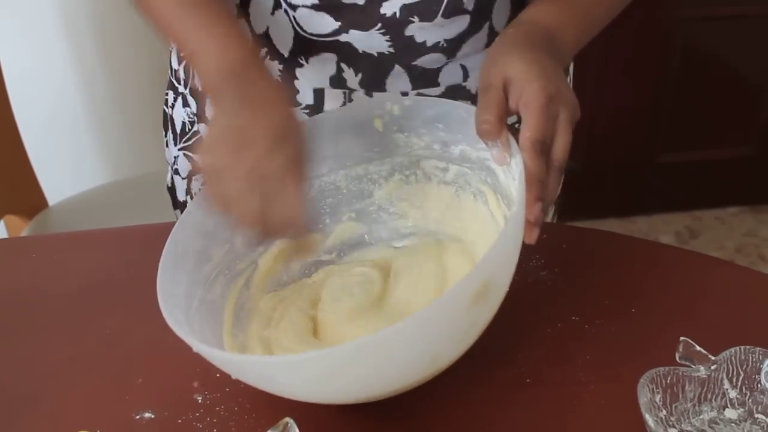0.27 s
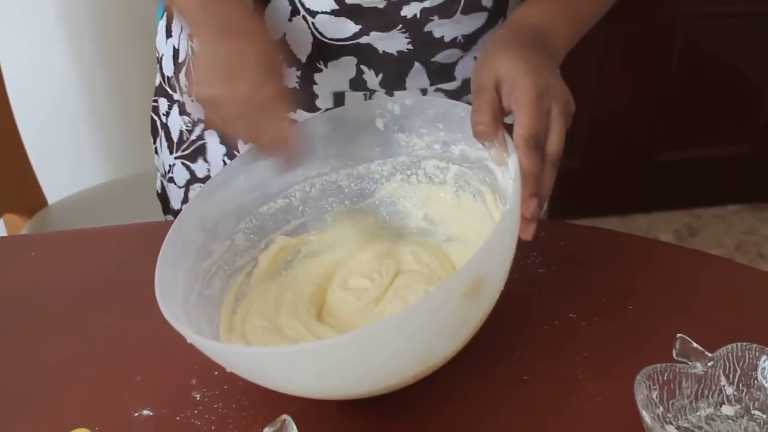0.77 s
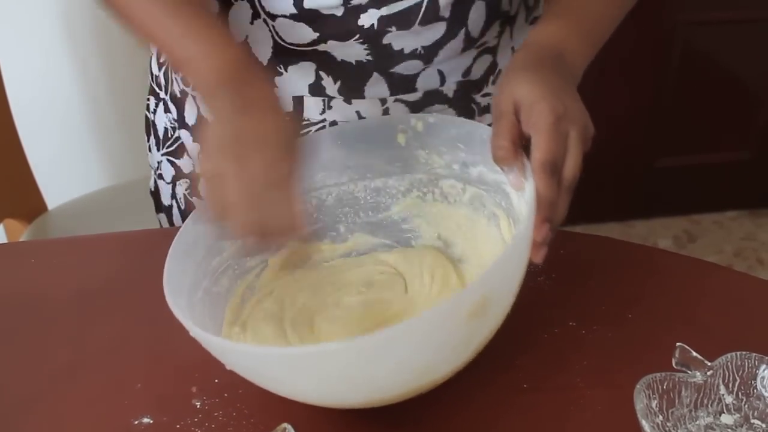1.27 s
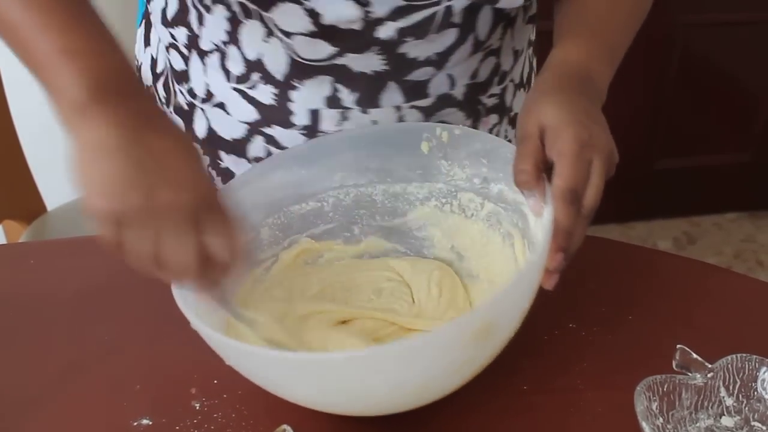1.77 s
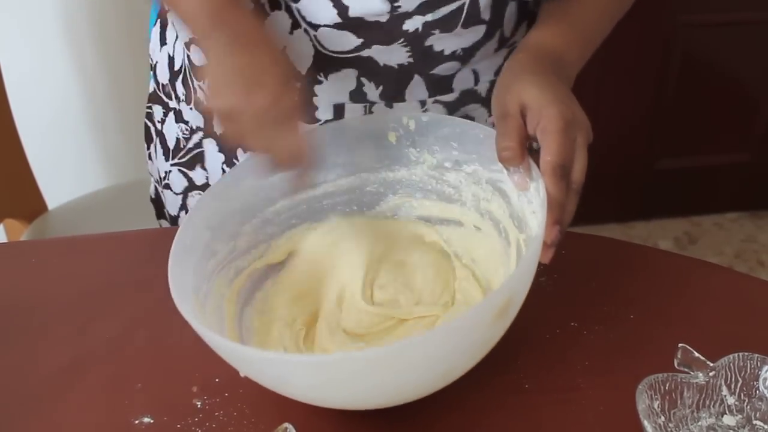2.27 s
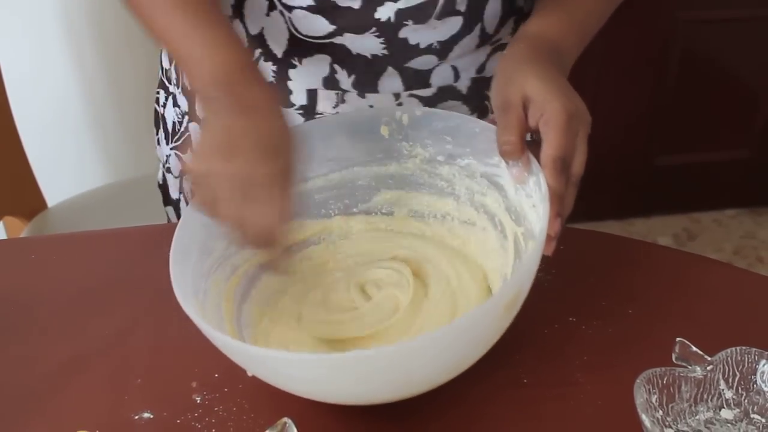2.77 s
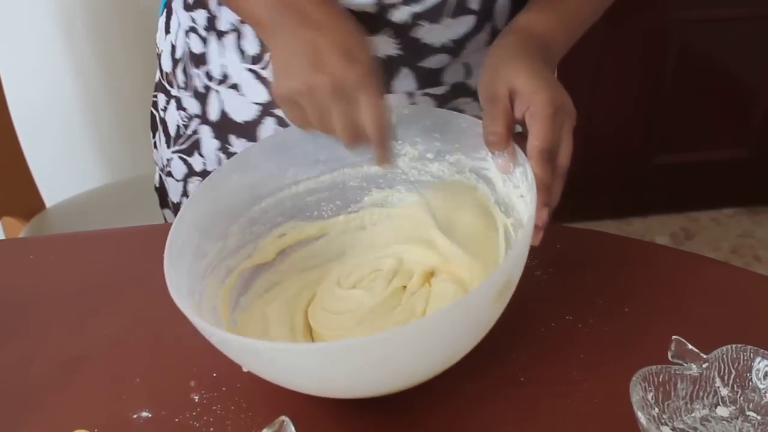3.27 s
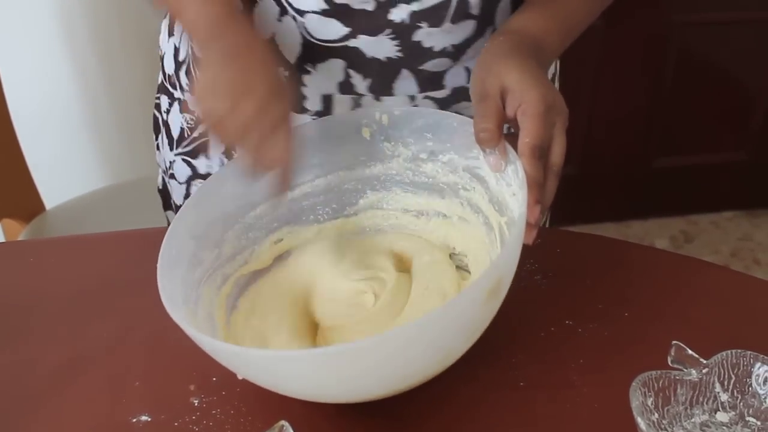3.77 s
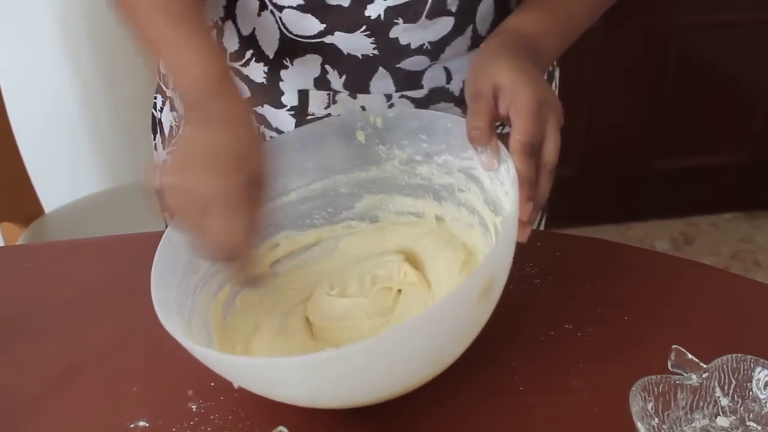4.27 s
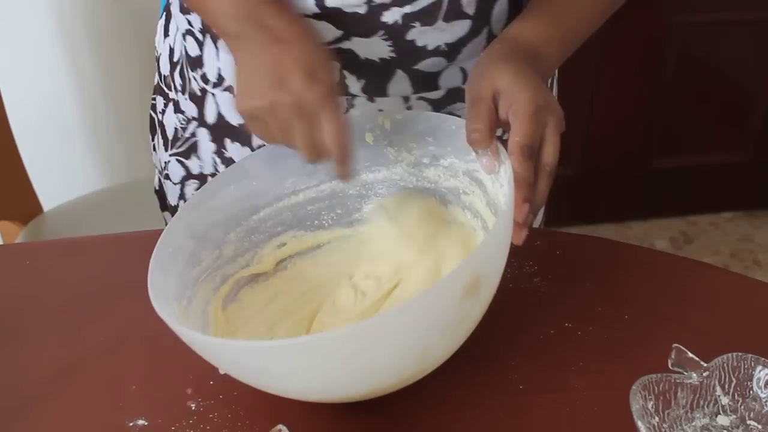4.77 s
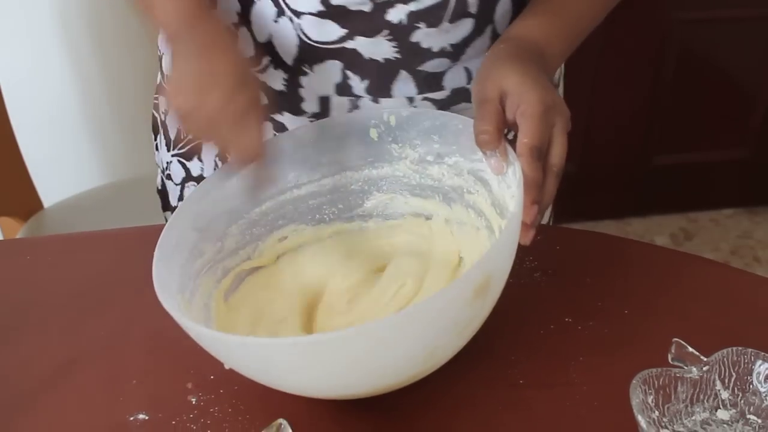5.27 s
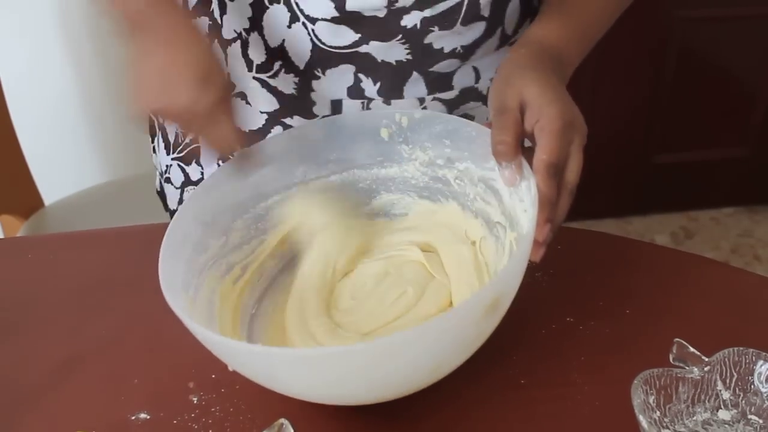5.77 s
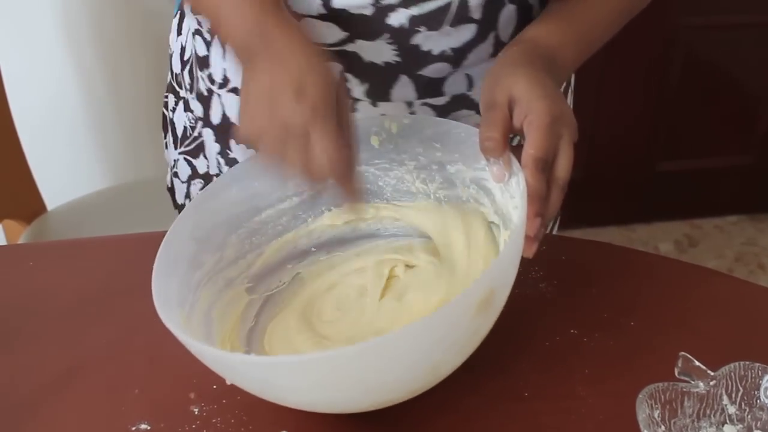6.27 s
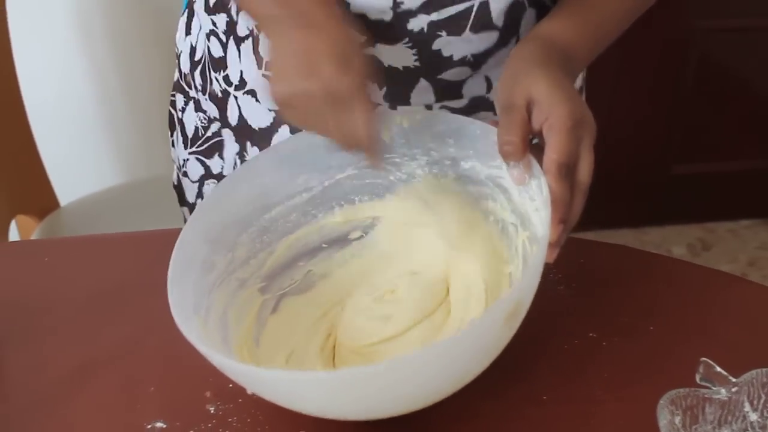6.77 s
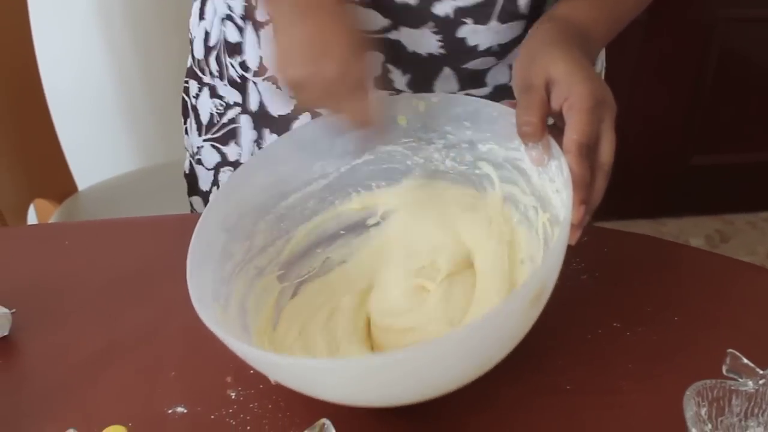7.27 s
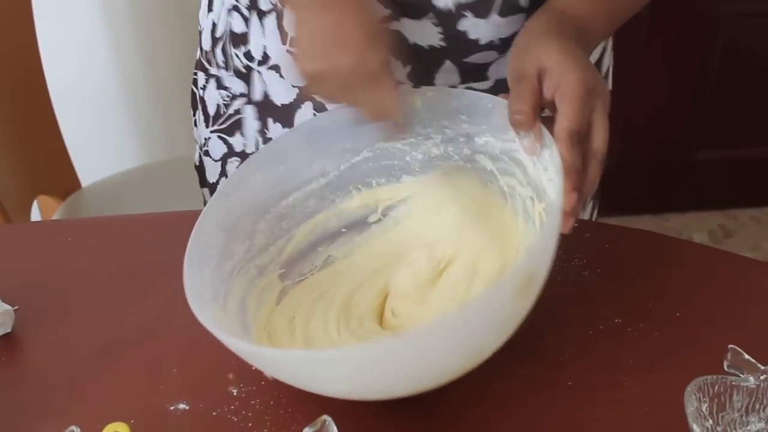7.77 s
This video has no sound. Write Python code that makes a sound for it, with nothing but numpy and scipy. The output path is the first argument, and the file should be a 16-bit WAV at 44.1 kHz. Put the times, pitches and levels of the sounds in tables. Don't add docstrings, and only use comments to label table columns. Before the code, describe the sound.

Close, rhythmic spoon knocks on a humming plastic bowl, each followed by a sugary scrape, quickening near the end in a lightly echoing kitchen.

```python
import sys
import numpy as np
from scipy import signal
from scipy.fft import rfft, irfft, next_fast_len
from scipy.io import wavfile
from scipy.ndimage import uniform_filter1d

SR = 44100
rng = np.random.default_rng(int(sys.argv[2]) if len(sys.argv) > 2 else 0)


def gain_from_db(level_db):
    decades = np.asarray(level_db, float) / 20
    return 10 ** decades


def master_out(mix):
    frames = np.transpose(np.atleast_2d(mix))
    ceiling = np.clip(frames, -1, 1)
    pcm = np.round(ceiling * 32767).astype(np.int16)
    wavfile.write(sys.argv[1], SR, pcm)


N = 354123


def unit(x):
    return x / np.sqrt(np.mean(x ** 2) + 1e-20)


def along(points, hz):
    f, v = np.transpose(points)
    return np.interp(np.log(hz + 1), np.log(f + 1), v)


def filtered(x, response):
    m = next_fast_len(len(x) + SR // 2)
    spectrum = rfft(x, m) * response(np.fft.rfftfreq(m, 1 / SR))
    return irfft(spectrum, m)[:len(x)]


def body(modes):
    def response(f):
        total = 0
        for k, (centre, width, db) in enumerate(modes):
            resonance = 1j * f * width / (centre * centre - f * f + 1j * f * width + 1)
            total = total + (-1) ** k * gain_from_db(db) * resonance
        return total
    return response


def colour(spectrum):
    return lambda hz: gain_from_db(along(spectrum, hz))


def grains(start_s, size, hz, cycles):
    k = np.arange(192)
    phase = k * hz[:, None] / SR
    wave = size[:, None] * np.sin(2 * np.pi * phase) * np.exp(-phase / cycles)
    where = (start_s * SR).astype(int)[:, None] + k
    return np.bincount(where.ravel(), wave.ravel(), N + SR)[:N]


# start_s, crack_peak_db, wall_ring_db and bowl_hum_db (both above crack), skid_grit_db
KNOCKS = [(0.1469, -19.5, 4.5, 4, -20), (0.485, -14.5, 2, -3.5, -20), (0.8463, -19.5, 7, 8.5, -18),
          (1.2114, -25.5, 11, 15.5, -27), (1.6827, -18, -3, -2, -20.5), (2.369, -13.5, 8.5, 3.5, -18),
          (2.692, -12, 5.5, 0, -24), (2.9236, -18, 1, 1, -20), (2.9844, -10, -9, -10.5, -19),
          (3.26, -15, 2, -3, -19), (3.5637, -22.5, 11, 9.5, -14), (3.787, -31.5, 7, 10, -54),
          (3.851, -18, 6.5, -1, -20), (4.123, -23, 3, 6.5, -21), (4.4733, -10.5, 4, 1.5, -17),
          (4.81, -8.5, 6.5, 2, -19), (5.0965, -15.5, 5, 5, -17.5), (5.404, -24.5, 7.5, 12, -28),
          (6.013, -25, -27, -2.5, -43), (6.0235, -14, -8, -23, -33.5), (6.1552, -18, -5, -30, -42)]
QUICK_KNOCKS = [(6.4802, -30, 16, 13.5, -30), (6.5167, -16.5, 7.5, 2.5, -15), (6.7221, -29.5, 7.5, 10, -33),
                (6.8003, -11.5, 0, 2, -16.5), (6.991, -22.5, 15.5, 8.5, -35), (7.067, -9, 2.5, 1.5, -12.5),
                (7.2417, -28, 12, 12, -47), (7.317, -12.5, 5, 5.5, -22), (7.47, -21, 10, 7.5, -31),
                (7.5714, -4.5, -13, -2, -34), (7.7195, -13.5, 3.5, -1, -23.5),
                (7.8116, -10.5, 9.5, 5.5, -23), (7.9519, -13, 4.5, -0.5, -20.5)]
# pitch_hz, level_db (per Hz)
CRACK_COLOUR = [(800, -47), (2000, -19), (3500, -4.5), (7000, -3), (12000, -14), (17000, -19)]
# pitch_hz, width_hz, level_db
THUD_MODES = [
    (435, 156, -1),
    (670, 150, -10.5),
]


def knocks():
    crack, wall_push, body_push = push = np.zeros((3, N))
    t = np.arange(256) / SR
    for s, db, wall_db, hum_db, _ in KNOCKS + QUICK_KNOCKS:
        at = round((s + 0.001072) * SR)
        crack[at:at + len(t)] += gain_from_db(db - 60 * t / 0.025) * np.sign(rng.standard_normal(len(t)))
        wall_push[at] = -gain_from_db(db + wall_db + 28.5)
        body_push[at] = -gain_from_db(db + hum_db + 40.5)
    push[1:] = signal.lfilter(np.hanning(18) / 8, 1, push[1:])
    late_push = np.roll(body_push, shift=40)
    clack = filtered(wall_push, body([(1800, 680, 1)]))
    clack += filtered(late_push / grip(), body(THUD_MODES[:1]))
    clack -= filtered(late_push * grip(), body(THUD_MODES[1:]))
    return filtered(crack, colour(CRACK_COLOUR)) + clack + wall_ring(wall_push) + hum(body_push)


# pitch_hz, width_hz, level_db
WALL_MODES = [(1110, 240, -3.5), (1332, 145, 0.5), (1518, 380, -2), (1784, 680, -4), (2870, 640, -13.5)]


def wall_ring(force):
    return filtered(force, body(WALL_MODES))


# pitch_hz, width_hz, level_db
HUM_MODES = [(270, 60, -7), (295.3, 93, -5.5), (373.5, 21.4, -2.5), (412.8, 10.3, -4), (453.5, 29.5, 3),
             (535.5, 9.2, -3), (606, 34, -5), (658.3, 44.6, -2.5), (708.7, 31, -6), (754, 89, -7.5)]


def hum(force):
    return filtered(force / grip(), body(HUM_MODES[:6])) + filtered(force * grip(), body(HUM_MODES[6:]))


# time_s, level_db
GRIP = [(0, 2), (.6, -0.5), (.84, 6.5), (1.2, 2.5), (1.7, 2), (2.7, -3.5), (2.93, 0.5), (3.3, -0.5),
        (3.57, 5.5), (3.78, -7), (3.85, 4), (3.92, -4), (4.2, 1.5), (4.8, -3.5), (6.5, 2.5), (7.1, 1),
        (7.35, 1.5), (8.03, -0.5)]


def grip():
    s, db = np.transpose(GRIP)
    return gain_from_db(np.interp(np.arange(N) / SR, s, db))


SKID_FADE = (290, 226, 211)
# deepest_s, width_s, grit_db, wall_ring_db
# and bowl_hum_db (both above grit)
SWEEPS = [(0.0, 0.085, -45, 9.5, 7.5), (0.19, 0.048, -32, 3, -3), (0.555, 0.036, -27.5, 3.5, 6),
          (0.878, 0.033, -30, 0, 4), (2.404, 0.026, -32.5, -12.5, 10.5), (2.742, 0.03, -33, 2, -8),
          (2.948, 0.018, -29, 4.5, -5), (3.011, 0.013, -21.5, 1, 6), (3.302, 0.043, -19, -7, -6),
          (3.603, 0.043, -24.5, -2, 2), (3.822, 0.042, -29, 3.5, 0), (3.892, 0.042, -21.5, 4, 5.5),
          (3.95, 0.062, -36.5, 15, 8), (4.15, 0.041, -16.5, -1, -5.5), (4.189, 0.03, -24, 10.5, 4.5),
          (4.27, 0.03, -27, 6.5, -4), (4.529, 0.028, -25, 3, -6), (4.851, 0.026, -33.5, 13, 12),
          (5.128, 0.013, -31, 15, -3), (5.45, 0.018, -30.5, 2, -11), (5.75, 0.017, -49, 0, 17),
          (6.26, .05, -51, -3, 15),
          (6.545, 0.045, -24, 6, -0.5), (6.584, 0.017, -38, 4, 8), (6.5, 0.014, -30, 9, 4),
                (6.62, 0.066, -35.5, 7, -5), (6.769, 0.021, -30.5, 8.5, -2), (6.82, 0.017, -22, 3, -10),
                (6.87, 0.09, -34, 7, -5), (7.042, 0.027, -27, 0, 2), (7.093, 0.027, -26, 11, -30),
                (7.15, 0.019, -25.5, 6, 5), (7.283, 0.023, -31.5, 7, -2), (7.341, 0.051, -23, 7, -13),
                (7.4, 0.2, -35, 6, -12), (7.53, 0.015, -49, 14, 2), (7.605, 0.06, -35.5, 19, 10),
                (7.68, 0.055, -47, 17, 21), (7.782, 0.023, -29.5, 7, -5), (7.85, 0.05, -31, -3, 6.5),
                (7.9, 0.044, -38.5, 18, 15), (8.02, 0.016, -26, 1, -3)]
# start_s, rise_s, hold_s, grit_db, wall_ring_db (above grit)
SCRAPES = [(1.721, 0.063, 0.031, -18.5, -13), (1.817, 0.028, 0.031, -25.5, -24),
           (1.873, 0.018, 0.05, -22.5, -18), (1.927, .025, 0.021, -23, -10),
           (1.982, 0.017, 0.032, -25, -13), (2.034, 0.011, 0.041, -31.5, 3), (2.126, 0.013, 0.013, -27, -4),
           (2.484, 0.0038, 0.0056, -22.5, -4), (3.095, 0.0063, 0.0062, -23.5, -1.5),
           (3.402, .012, 0.021, -21.5, -2.5), (4.294, 0.005, 0.025, -18.5, 2.5),
           (5.521, 0.076, 0.055, -33.5, 5), (5.599, 0.022, 0.043, -29, -8), (5.654, 0.058, 0.1, -18.5, -10),
           (5.767, 0.032, 0.044, -32.5, 1.5), (6.153, 0.0027, 0.0055, -26, -15),
           (6.174, 0.012, 0.0039, -19.5, -5.5), (6.209, 0.017, 0.025, -22.5, -2),
           (6.23, 0.0063, 0.017, -31, -6), (6.274, 0.0072, 0.04, -31, -3), (7.192, 0.0046, 0.0053, -27, 3),
           (7.534, 0.025, 0.0077, -25, 9)]


def pressure():
    level = np.full((3, N + SR), 1e-6)
    t = np.arange(SR // 2) / SR
    bite = np.minimum(t / 0.007, 1)
    skid_late_s, skid_wall_db, skid_hum_db = 0.0012, -6, -3
    for s, crack_db, wall_db, hum_db, grit_db in KNOCKS + QUICK_KNOCKS:
        db = np.array([grit_db, crack_db + wall_db + skid_wall_db, crack_db + hum_db + skid_hum_db])
        at = round((s + skid_late_s) * SR) + SR // 2
        level[:, at:at + len(t)] += gain_from_db(db[:, None] - np.outer(SKID_FADE, t)) * bite
    edge_db, lingers = 16.5, 1.56
    for s, width, grit_db, wall_db, hum_db in SWEEPS:
        u = (t - t[-1] / 2) / width
        swell_db = grit_db - edge_db * np.where(u < 0, u, u / lingers) ** 2
        at = round(s * SR) + SR // 4
        level[:, at:at + len(t)] += gain_from_db(swell_db + np.array([[0], [wall_db], [hum_db]]))
    rise_db, lift_db_per_s, scrape_hum_db = 10.5, 487, -14
    for s, rise, hold, grit_db, wall_db in SCRAPES:
        shape_db = grit_db - rise_db * np.maximum(1 - t / rise, 0)
        shape_db -= lift_db_per_s * np.maximum(t - rise - hold, 0)
        at = round(s * SR) + SR // 2
        level[:, at:at + len(t)] += gain_from_db(shape_db + np.array([[0], [wall_db], [scrape_hum_db]])) * bite
    return level[:, SR // 2:][:, :N]


# pitch_hz, level_db (per Hz)
GRIT_COLOUR = [(880, -13.5), (1500, -22), (2800, 2), (3090, 3), (4020, -0.5), (8290, 1), (9420, -1.5),
               (12400, -2.5), (15500, -12)]


def scrape():
    grit_level, wall_level, hum_level = pressure()
    when, chance, _ = rng.random((20000, 3)).T
    pitch_hz = np.clip(6000 * np.exp(0.656 * rng.standard_normal(len(when))), 1500, 21000)
    size = gain_from_db(2.9 * np.minimum(-np.log(chance), 3))
    crunch = unit(grains(when * N / SR, size, pitch_hz, cycles=2.5))
    hiss = unit(filtered(rng.standard_normal(N), colour(GRIT_COLOUR)))
    crunch = filtered(crunch, colour([(700, -20), (2000, .1)]))
    grit = patchy(crunch + gain_from_db(-1) * hiss, patchy_db=3.0, clumpy_db=2.0)
    bare = np.minimum(grit_level / hum_level, 4.5) ** 1.28
    coarse = np.minimum(wall_level / grit_level, 1) ** 0.78
    grit -= (1 - coarse) * filtered(grit, colour([(2300, -1.5), (4200, -20)]))
    sizzle = filtered(grit, colour([(6000, -21.5), (11000, -7.0)]))
    wall = wall_ring(wall_level * rough_drive(rate=1500, spread_db=5.5))
    drone = hum(hum_level * rough_drive(rate=500, spread_db=5.0))
    return gain_from_db(-5.0) * grit_level * (grit + (0.4 * bare - 1) * sizzle) + gain_from_db(7) * wall + gain_from_db(14) * drone


def patchy(x, patchy_db, clumpy_db):
    z = signal.stft(x, nperseg=128)[2]
    field = rng.standard_normal(z.shape)
    for _ in range(2):
        field = uniform_filter1d(uniform_filter1d(field, size=6, axis=0), size=14, axis=1)
    bursts = uniform_filter1d(rng.standard_normal(z.shape[1]), size=2)
    gain = gain_from_db(patchy_db * unit(field) + clumpy_db * unit(bursts))
    return unit(signal.istft(z * gain, nperseg=128)[1][:N])


def rough_drive(rate, spread_db):
    kick = (rng.random(N) < rate / SR) * rng.standard_normal(N)
    return unit(kick * gain_from_db(spread_db * np.minimum(rng.exponential(size=N), 2)))


# start_s, peak_db,
# pitch_hz
SNAPS = [(0.1988, -24, 2630), (1.168, -26, 5840), (1.7556, -11, 3220), (1.796, -3, 6400), (1.85, -9, 3850),
         (1.8996, 1.5, 3300), (1.9545, -1.5, 3300), (2.0503, -10, 3030), (2.335, -18.5, 2200),
         (2.6207, -7, 4260), (3.3745, -14, 2520), (3.426, -1.5, 6040), (3.5978, -19, 2930),
         (3.886, -4, 4830), (4.0954, -19, 2730), (4.1895, -9, 3120), (4.4314, -9.5, 7450),
         (4.6674, -16, 6540), (4.77, -30, 4500), (5.345, -31, 3200), (6.002, -23, 6000), (6.549, -5, 5200),
         (6.816, -6, 4860), (7.5713, 0, 3200), (4.9555, -20, 3420), (5.3719, -17, 8400), (5.4453, -7, 7800),
         (5.7198, 2, 5750), (5.8655, -7.5, 5000), (6.121, -18.5, 6340), (6.189, 6, 5000), (6.1965, 3, 6300),
         (6.8314, 0.5, 2630), (6.9713, -6, 5300), (7.1547, -4, 5250), (7.7, -25, 5030),
         (0.5448, -7, 5170), (1.7913, -6, 9430), (1.8163, -4, 6680), (1.8925, -5, 10000), (1.919, -3, 8010),
         (1.9252, -5, 3190), (1.943, -3, 10550), (1.9934, -7, 10030), (1.9985, -8, 8740),
         (2.0019, -14, 3100), (2.3349, -13, 8800), (2.7998, -22, 9500), (2.967, -12, 7750),
         (2.989, -1, 7840), (3.0063, -3, 1940), (3.11, -11.5, 2470), (3.2697, -7, 6930), (3.283, -9, 6590),
         (3.4374, -8, 8830), (3.602, -4, 1980), (3.911, -12, 1774), (4.1589, -2, 8300), (4.267, -14, 2900),
         (4.3141, -4, 8530), (4.668, -11, 1820), (5.3719, -19, 8150), (5.4088, -16, 5730),
         (5.6336, -14, 3530), (5.7456, -6, 5470), (5.7586, -3, 5600), (5.762, -8, 5080), (5.7749, -5, 5300),
         (5.7949, -7, 10770), (5.8033, 3, 8230), (5.808, -0.5, 4400), (5.8327, 0, 5640), (5.85, -1.5, 7060),
         (6.16, -2, 5900), (6.183, -5, 6160), (6.2037, -6, 7280), (6.2074, -7, 2810), (6.2115, -5, 5860),
         (6.215, -7, 6300), (6.2262, -3, 12500), (6.243, -3, 7580), (6.2483, -6, 7200), (6.2634, -21, 2280),
         (6.5526, -5, 3490), (7.078, -7, 1810), (7.1611, -11, 7020), (7.2103, -11, 3360),
         (7.3316, -3, 5170), (7.3356, -6, 4800), (7.338, -11, 4260), (7.473, -10, 2930), (7.963, -7, 2800)]


def snaps():
    s, db, hz = np.transpose(SNAPS)
    late = rng.random((len(s), 8)) ** 2
    shift = rng.standard_normal((len(s), 8))
    spit_hz = np.clip(1.6 * hz[:, None] * np.exp(0.52 * shift), 1500, 21000)
    spit_s = s[:, None] + 0.002 * late
    spit_size = gain_from_db(db[:, None] - 13 - 3.6 * late)
    spit = grains(spit_s.ravel(), spit_size.ravel(), spit_hz.ravel(), cycles=1.8)
    pops = gain_from_db(-3) * grains(s, gain_from_db(db), hz, cycles=1.7)
    return filtered(pops + spit, lambda f: (1j * f / (1500 + 1j * f)) ** 2)


# middle_s, pitch_hz, level_db, spread_s
CLUMPS = [(0.545, 5000, -36, 0.0075), (1.792, 6000, -25, 0.012), (1.863, 3500, -29.5, 0.0088),
          (1.907, 2760, -25, 0.0078), (1.957, 1720, -25.5, 0.016), (2.045, 3240, -31, .008),
          (2.136, 5900, -34, .008), (2.951, 6300, -31, .007), (2.988, 2420, -28, 0.0033),
          (3.007, 3120, -32, 0.0067), (3.305, 5300, -33, 0.0073), (3.433, 2020, -31, 0.0099),
          (4.271, 3000, -27.5, 0.0087), (4.32, 8450, -24, 0.013), (4.326, 5500, -26, 0.016),
          (5.714, 4500, -31, 0.0085), (5.76, 3150, -31, 0.011), (5.786, 8200, -26, 0.014),
          (5.846, 2500, -26.5, 0.0068), (5.861, 2210, -30, 0.0016), (6.241, 12800, -23, 0.006),
          (6.234, 2900, -25, 0.01), (6.248, 7550, -27, 0.0064), (6.264, 2120, -30, .005),
          (6.53, 5500, -17.5, 0.011), (6.55, 3360, -22, 0.0055), (6.813, 5150, -21, .005),
          (0.152, 2980, -33, 0.0037), (0.493, 3000, -29, 0.0035), (5.643, 3500, -39, 0.018),
          (5.699, 7700, -19, 0.016), (6.221, 11500, -20, 0.006), (7.33, 4830, -26, 0.0064),
          (7.589, 4500, -26, 0.0046)]


def clumps():
    s, hz, db, length = np.transpose(CLUMPS)[..., None]
    late, shift, size = np.moveaxis(rng.standard_normal((len(s), 30, 3)), 2, 0)
    grain_s = s + length * np.clip(late, -1, 2)
    grain_hz = hz * np.exp(.11 * shift)
    return grains(grain_s.ravel(), gain_from_db(db + 3.1 * size).ravel(), grain_hz.ravel(), cycles=4)


# start_s, end_s, start_hz, end_hz, level_db
FURROWS = [
    (1.875, 1.96, 4550, 1600, -31),
    (6.819, 6.844, 5570, 1830, -36),
]


def furrows():
    out = 0
    for start, end, start_hz, end_hz, db in FURROWS:
        u, scatter, size = rng.random((3, 60))
        hz = start_hz * (end_hz / start_hz) ** u * (1.13 + 0.14 * scatter)
        grain_size = gain_from_db(db + 5.9 * size) * np.sin(np.pi * u)
        out = out + grains(start + u * (end - start), grain_size, hz, cycles=3)
    return out


# middle_s, pitch_hz, level_db
POCKETS = [(3.013, 1690, -23), (3.3, 1655, -23.5), (3.9, 1670, -32), (3.1, 1700, -35), (6.555, 1500, -26),
           (7.9, 1300, -31), (7, 1400, -29), (7.86, 1020, -31), (7.785, 1390, -29), (3.6, 1870, -21.5),
           (3.893, 1590, -20.5), (4.19, 1550, -24), (4.529, 1400, -32), (0.165, 2970, -35),
           (2.14, 1720, -39), (6.541, 1860, -24), (6.824, 1780, -25), (7.349, 1670, -32),
           (7.606, 1280, -30)]


def pockets():
    s, hz, db = np.transpose(POCKETS)[..., None]
    late, shift, size = np.moveaxis(rng.standard_normal((len(s), 40, 3)), 2, 0)
    pop_s = s + 0.010 * late
    pop_hz = hz * np.exp(0.086 * shift)
    return grains(pop_s.ravel(), gain_from_db(db + 2.3 * size).ravel(), pop_hz.ravel(), cycles=9.4)


# start_s, peak_db, pitch_hz
BUBBLES = [(.339, -46, 12000), (.377, -42, 10500), (.437, -44, 11000), (.731, -46, 12500),
           (.795, -43, 11500), (.818, -45, 9500), (.832, -45, 8500), (.839, -41, 12000), (.962, -38, 12000),
           (1.0025, -37, 8000), (1.0364, -41, 13000), (1.0604, -41, 5200), (1.1508, -43, 12000),
           (1.1754, -41, 8000), (2.325, -40, 12000), (2.6314, -38, 5500), (2.6434, -40, 11000),
           (2.8114, -41, 9000), (6.1428, -42, 12500), (6.156, -19, 6000), (6.1918, -11, 5630),
           (6.6844, -36, 11000), (6.7224, -35, 13500)]


def bubbles():
    s, db, hz = np.transpose(BUBBLES)
    pops = grains(s, gain_from_db(db + 9), hz, cycles=1.4)
    pops += grains(s + .0007, gain_from_db(db + 4), 1.37 * hz.clip(0, 11000), cycles=1.6)
    return filtered(pops, lambda f: (1j * f / (4000 + 1j * f)) ** 3)


# pitch_hz, level_db
RIM_MODES = [(1050, 2), (2700, 0), (3820, -1), (5860, -3)]
# start_s, peak_db
RIM_TAPS = [
    (1.6838, -20),
    (2.3702, -20),
    (4.8112, -18),
    (2.6932, -22),
]


def rim():
    s, db = np.transpose(RIM_TAPS)
    out = 0
    for hz, mode_db in RIM_MODES:
        out = out + grains(s, gain_from_db(db + mode_db), np.full(len(s), hz), cycles=hz * .0016)
    return out


# start_s, peak_db, pitch_hz, t60_s (time to fall 60 dB)
THUMPS = [(5.315, -23.5, 187, 0.12), (5.33, -25.5, 103, 0.24), (6.724, -11.5, 283, 0.018),
          (6.992, -8, 298, 0.028), (7.244, -10.5, 283, 0.023), (7.471, -9, 261, 0.043),
          (7.598, -8, 297, 0.037), (7.721, -4, 270, 0.02), (7.955, -16.5, 255, 0.072)]


def thumps():
    out = np.zeros(N + SR)
    t = np.arange(SR // 4) / SR
    for s, db, hz, t60 in THUMPS:
        tone = np.sin(2 * np.pi * hz * t)
        deep = 0.14 * gain_from_db(25 * t / t60) * np.sin(2 * np.pi * 0.577 * hz * t)
        soft_start = 1 - np.exp(-t / 0.002)
        out[round(s * SR):][:len(t)] += gain_from_db(db - 60 * t / t60) * (tone + deep) * soft_start
    return out[:N]


# pitch_hz, level_db, t60_s
BANGLE_MODES = [(3300, 6, 0.033), (5660, 11, 0.013), (9840, 4, 0.05)]
# start_s, peak_db
TINKS = [(0.0538, -73), (0.6848, -69), (1.0475, -69), (1.415, -71), (1.595, -74), (4.7665, -65),
         (5.088, -65)]


def bangle():
    t = np.arange(SR // 8) / SR
    ring = sum(gain_from_db(db - 60 * t / t60) * np.sin(2 * np.pi * hz * t) for hz, db, t60 in BANGLE_MODES)
    s, db = np.transpose(TINKS)
    touches = np.zeros(N)
    touches[(s * SR).astype(int)] = gain_from_db(db + 17.0)
    return signal.fftconvolve(touches, ring)[:N]


# pitch_hz, t60_s
KITCHEN_FADE = [(150, 0.4), (400, 0.73), (1000, 0.7), (2800, 0.55), (7000, 0.5), (15000, 0.28)]


def kitchen(x):
    step = SR // 4
    out = np.zeros(N + 2 * SR)
    fade = np.hanning(2 * step)
    x = np.pad(x, (step, 2 * step))
    for at in range(0, N + step, step):
        hz, t, z = signal.stft(rng.standard_normal(3 * step), SR, nperseg=256)
        dying = gain_from_db(-60 * t / along(KITCHEN_FADE, hz)[:, None])
        tail = signal.istft(z * dying, SR, nperseg=256)[1]
        tail *= 1 - np.exp(-np.arange(len(tail)) / SR / 0.013)
        echo = signal.fftconvolve(x[at:at + 2 * step] * fade, tail / np.linalg.norm(tail))
        out[at:at + len(echo)] += echo
    return out[step:step + N]


# time_s, level_db
RUMBLE = [(0, -61), (0.9, -46), (1.9, -58), (2.45, -49), (3.5, -59.5), (4.0, -45.5), (5.252, -47),
          (5.5, -39), (5.75, -52.5), (7.2, -48.5), (8.03, -39)]
# pitch_hz, level_db (per Hz)
RUMBLE_COLOUR = [(60, -34), (100, -7), (125, 10), (180, 11), (260, -12), (330, -26)]
# pitch_hz, level_db (per Hz)
HOUSE_COLOUR = [(15, -48), (25, -1), (104, -9), (129, -4.5), (173, -7.5), (260, -3), (378, -7), (567, -12),
                (703, -6.5), (804, -12.5), (895, -8), (970, -15), (9500, -37.5), (15500, -59)]


def house():
    s, db = np.transpose(RUMBLE)
    rumble = unit(filtered(rng.standard_normal(N), colour(RUMBLE_COLOUR)))
    rumble *= gain_from_db(np.interp(np.arange(N) / SR, s, db))
    steady = unit(filtered(rng.standard_normal(N), colour(HOUSE_COLOUR)))
    return rumble + gain_from_db(-42) * steady


def scene():
    squelch = pockets()
    near = knocks() + scrape() + snaps() + clumps() + furrows() + bubbles() + rim() + thumps() + bangle()
    louder_lows = colour([(400, -2.0), (2000, -1.5), (8000, -6.0)])
    echoes = filtered(kitchen(near + gain_from_db(-3.5) * squelch), louder_lows)
    return (near + squelch + gain_from_db(-4.5) * echoes + house())[None]


def roll_off(x):
    return signal.sosfilt(signal.butter(12, 16970, fs=SR, output="sos"), x)


def record(dry):
    top_hz = 15750
    rounded = dry[0] / (1 + np.abs(dry[0] / .74) ** 4) ** (1 / 4)

    def microphone(hz):
        bass_cut = (1j * hz / 110 / (1 + 1j * hz / 110)) ** 3
        return bass_cut * np.where(hz < top_hz, 1, gain_from_db(-44)) * (hz < top_hz + 1300)

    kept = filtered(rounded, microphone)
    kept += 0.05 * filtered(rounded ** 2, lambda hz: (hz > 12) / (1 + (hz / 90) ** 2))
    return roll_off(kept[None])


dry = scene()
out = record(dry)
master_out(out)
```